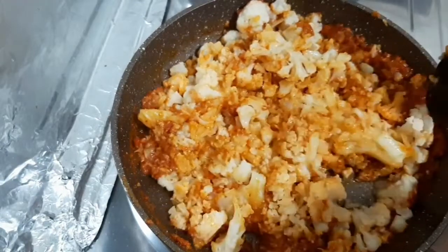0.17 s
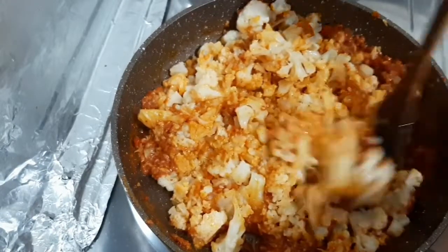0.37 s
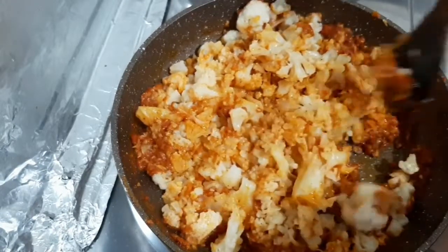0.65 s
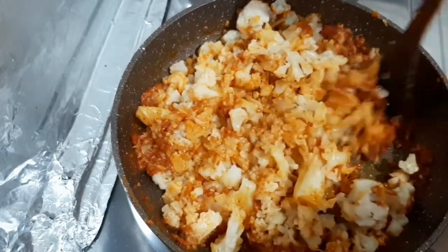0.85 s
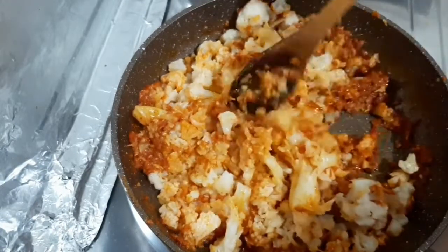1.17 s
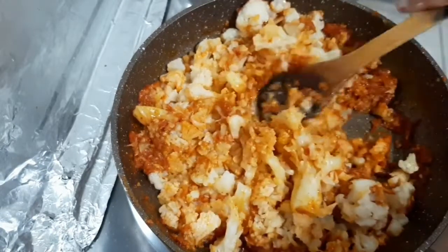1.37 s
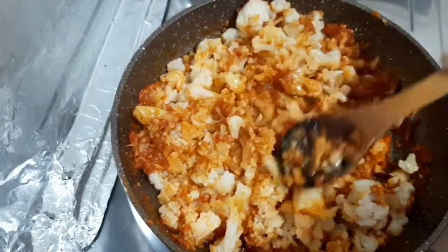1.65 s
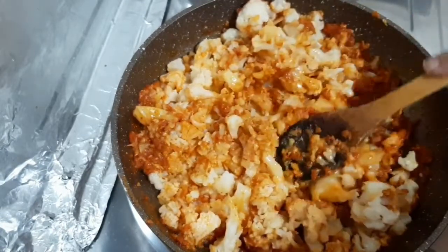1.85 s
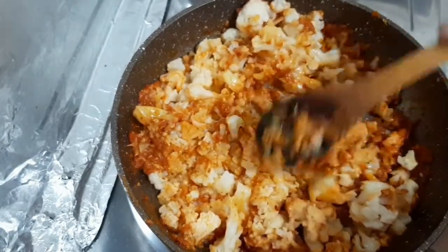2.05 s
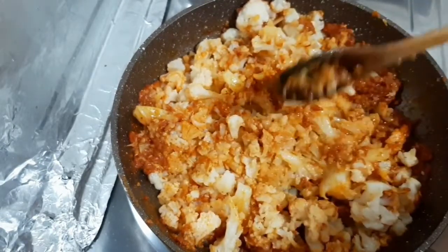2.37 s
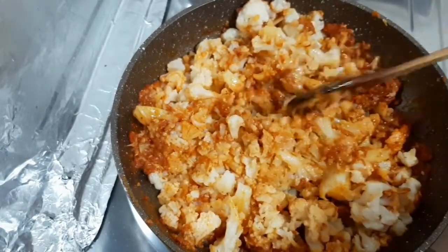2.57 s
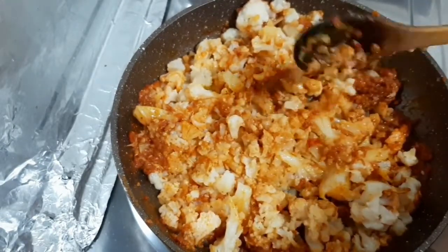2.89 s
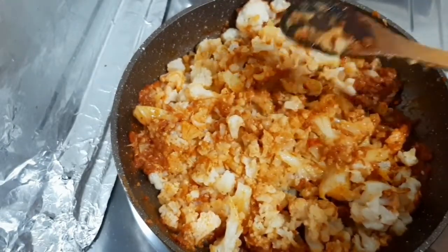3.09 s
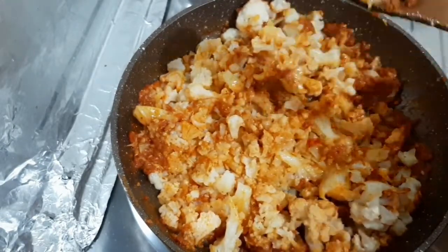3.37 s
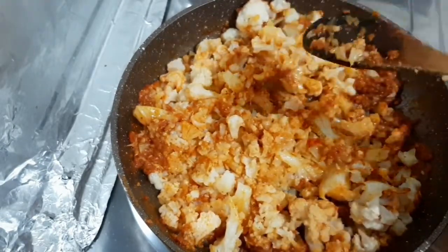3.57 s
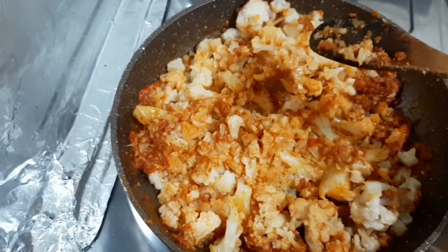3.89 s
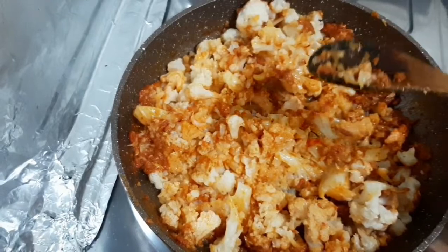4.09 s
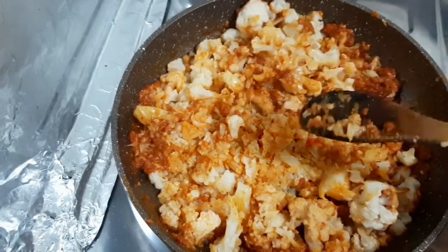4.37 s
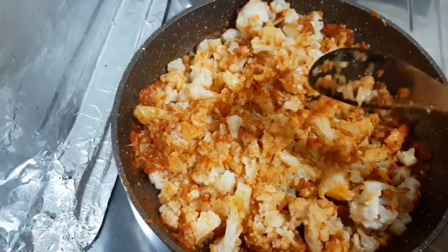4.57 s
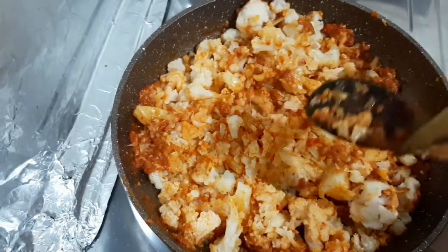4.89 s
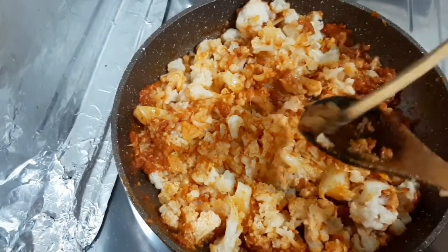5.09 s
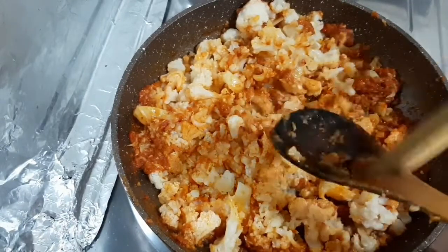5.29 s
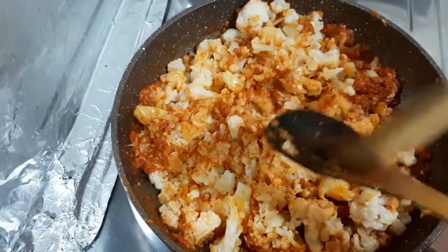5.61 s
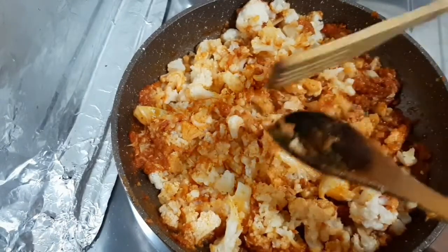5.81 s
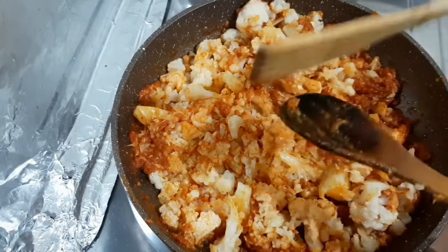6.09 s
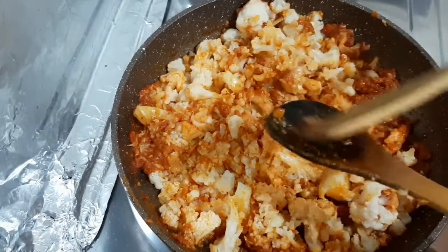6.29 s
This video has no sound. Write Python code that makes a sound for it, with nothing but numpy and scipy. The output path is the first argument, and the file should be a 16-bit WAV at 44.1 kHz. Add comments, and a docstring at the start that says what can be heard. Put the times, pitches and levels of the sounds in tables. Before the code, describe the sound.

A faint sizzle and a low, throbbing appliance hum run throughout in a small kitchen, the sizzle easing toward the end. From the start to about 2.3 seconds, a wooden spatula stirs cauliflower in sauce with soft wet squelches and tiny pops. It scrapes the pan with a brief squeak at 0.3 seconds, then gives a light tap, a small knock and another dark, grainy scrape around 0.8. At 2.7 seconds a loud knock sets the pan ringing, followed by a few quick, fading wobbles and softer scraping. At about 4.1 seconds a bright metallic clink leads straight into a loud, heavy bump that rings briefly. From 4.8 seconds to the end, near 6.4, a second wooden utensil taps the spatula with short, bright clicks, alternating with five soft wipes of wood on wood. The clearest taps fall at 4.8, 5.9 and 6.2 seconds.

```python
"""A wooden spatula stirs cauliflower in sauce in a nonstick pan: tiny slips make it scrape and squelch,
its edge squeaks, and films of sauce snap. Two loud knocks ring out in the small kitchen, the second
a heavy bump led by a metallic clink. Then a second wooden utensil taps the spatula and wipes it clean.
Underneath, steam bubbles sizzle faintly over the low, throbbing hum of an appliance."""
import sys
import numpy as np
from scipy import signal
from scipy.fft import rfft, irfft
from scipy.io import wavfile

SR = 44100
rng = np.random.default_rng(int(sys.argv[2]) if len(sys.argv) > 2 else 0)


def waveform_to_disk(signal):
    """Save audio, clipped to [-1, 1], as 16-bit WAV at the path in sys.argv[1]."""
    frames = np.transpose(np.atleast_2d(signal))
    scaled = np.clip(frames, -1, 1) * 32767
    samples = np.round(scaled).astype(np.int16)
    wavfile.write(sys.argv[1], SR, samples)


N = 284445
T = np.arange(N) / SR
RING = T[:int(.8 * SR)]  # time axis of a ringing tail

# strokes through the wet food: (peak t/s, rise/s, fall/s, level/dB)
WET_STROKES = [(0.361, 0.19, 0.17, -55), (.87, 0.2, 0.31, -56), (1.34, 0.19, 0.23, -61),
               (1.76, .12, 0.069, -55.5), (1.906, 0.053, 0.037, -58.5), (2.199, 0.13, 0.12, -58.5)]


def undb(db):
    """Decibels to gain."""
    return 10 ** (np.asarray(db) / 20)


def unit(x):
    """Scale to an average energy of one per channel."""
    return x / np.sqrt(np.mean(np.sum(x ** 2, axis=-1)))


def curve(rows):
    """Straight-line automation through (t/s, value) points."""
    return np.interp(T, *np.transpose(rows))


def fade(t60):
    """Exponential decay, 60 dB down after t60 seconds."""
    return np.exp(-np.log(1000) * RING / t60)


def convolve(x, response):
    """Pass a sound through a response, keeping its length."""
    return signal.oaconvolve(np.atleast_2d(x), np.atleast_2d(response), axes=-1)[:, :x.shape[-1]]


def colour(x, points, size=8192):
    """Minimum-phase EQ through (f/Hz, level/dB) points that keeps the power of white noise."""
    hz, db = np.transpose(points)
    bin_hz = np.arange(size // 2 + 1) * SR / size
    log_gain = np.interp(np.log(bin_hz + 1), np.log(hz), np.log(undb(db)))
    cepstrum = irfft(log_gain)[:size // 2]
    cepstrum[1:] *= 2
    return convolve(x, unit(irfft(np.exp(rfft(cepstrum, size)))))


def ports(pair, split_hz=850, least_width=0.27):
    """Two microphone ports hear long waves nearly alike and short waves differently."""
    hz = np.arange(pair.shape[-1] // 2 + 1) * SR / pair.shape[-1]
    width = np.clip(hz / np.hypot(hz, split_hz), least_width, 1)
    mid, side = rfft(pair) * np.sqrt([1 - width ** 2 / 2, width ** 2 / 2])
    return irfft(np.array([mid + side, mid - side]), pair.shape[-1])


def noise(size):
    """Diffuse stereo noise."""
    return ports(rng.standard_normal((2, size)))


def walk(per_s):
    """Random drift with a spread near one."""
    knots = rng.standard_normal(512)
    return np.interp(T * per_s, np.arange(len(knots)), knots)


def grains(per_s, spread_db):
    """Random tiny clicks of uneven size, rms one."""
    sizes = rng.standard_normal((2, N)) * undb(spread_db * np.clip(rng.standard_normal(N), -2, 2))
    fires = rng.random(N) < per_s / SR
    return unit(ports(sizes * fires)) * np.sqrt(N)


def add(track, s, sound):
    """Mix a sound in at s seconds."""
    start = int(s * SR)
    track[..., start:start + sound.shape[-1]] += sound[..., :N - start]


def kitchen(x, wet_db, t60_s=0.54, treble_t60_s=0.48, treble_hz=4000, build_s=0.0039):
    """Direct sound plus the dense echo of hard walls, whose treble dies first."""
    field = noise(len(RING))
    low = signal.sosfilt(signal.butter(2, treble_hz, fs=SR, output="sos"), field)
    tail = field * fade(treble_t60_s) + low * (fade(t60_s) - fade(treble_t60_s))
    onset = 1 - np.exp(-(RING / build_s) ** 2)
    return x + undb(wet_db) * convolve(x, unit(tail * onset))


def push(db, contact_ms, size=1024):
    """Force pulse of a blow; a longer contact leaves out the treble."""
    force = np.exp(-RING[:size] * 1000 / contact_ms)
    return undb(db) * np.sqrt(SR / 100) * force / force.sum()


def scatter(spread_ms, count=4, size=4096):
    """Waves run to and fro in the struck object (all-pass echoes), reaching each port by its own path."""
    lags = rng.uniform(.3, 1.7, (count, 1, 1)) * spread_ms / count * SR / 1000
    lags = lags + rng.uniform(0, 5, (count, 2, 1))
    delay = np.exp(-2j * np.pi * np.arange(size // 2 + 1) * np.ceil(lags) / size)
    return irfft(np.prod((.65 + delay) / (1 + .65 * delay), axis=0))


def crack(hits, eq, spread_ms, wet_db):
    """The sharp attack of each blow in the room; an optional pitch ratio stands for where it lands."""
    track = np.zeros((2, N))
    for s, db, contact_ms, *ratio in hits:
        shifted_eq = [(hz * np.prod(ratio), gain_db) for hz, gain_db in eq]
        add(track, s, colour(convolve(scatter(spread_ms), push(db, contact_ms)), shifted_eq))
    return kitchen(track, wet_db)


def ring(hits, modes, build_s, apart_hz=2500):
    """Struck modes swell and ring on; high ones reach the ports out of step."""
    force = np.zeros(N)
    for s, db, contact_ms in hits:
        add(force, s, push(db, contact_ms))
    response = 0
    for hz, db, t60 in modes:
        lag = rng.uniform(0.32, 1) * min(hz / apart_hz, 1) * np.array([[1], [-1]])
        response = response + undb(db) * fade(t60) * np.sin(2 * np.pi * hz * RING + lag)
    return convolve(force, response * (1 - np.exp(-RING / build_s))) / np.sqrt(SR / 100)


def rub(strokes, eq, per_s):
    """Tiny slips follow the pressure of each stroke, which judders in the hand."""
    pressure = sum(undb(db) * np.interp(T, [s - rise, s, s + fall], [0, 1, 0])
                   for s, rise, fall, db in strokes)
    slips = grains(per_s, spread_db=3) * undb(2 * walk(110))
    return colour(slips * pressure, eq)


def tone(hz):
    """A sine of rms one that follows a moving pitch."""
    return np.sqrt(2) * np.sin(2 * np.pi * np.cumsum(hz) / SR)


def appliance(hum_hz=103, upper_hz=147, drone_hz=68.8, throb_hz=2.68, throb_depth=.55, crest_s=.16):
    """Throbbing, wavering motor tones over a low rumble."""
    # slow level ride of the hum: (t/s, level/dB)
    hum_ride = [(0, -61.5), (.5, -61.5), (.8, -51), (1.3, -55.5), (2.5, -55.5), (3.15, -51), (3.55, -63.5),
                (3.75, -55), (4.7, -58.5), (5.2, -54.5), (5.6, -58), (6.05, -52.5), (6.45, -59)]
    # the deep drone swells, holds and sinks back: (middle t/s, length/s, level/dB)
    drone_swells = [(0.755, .26, -55), (5.998, 0.79, -52.5)]
    # EQ of the rumble: (f/Hz, level/dB)
    rumble_eq = [(20, -30), (40, -8.5), (52, -6.5), (85, -0.5), (110, -3.5), (150, 1.5), (175, -8.5),
                 (205, -3.5), (260, -7), (320, -19.5), (410, -17), (550, -31.5), (1000, -37.5), (3000, -56)]
    throb = 1 + throb_depth * np.cos(2 * np.pi * throb_hz * (T - crest_s))
    motor = tone(hum_hz + 1.3 * walk(3.3)) + undb(-13) * tone(200 + 4 * walk(12))
    hum = undb(curve(hum_ride)) * throb * motor
    upper = undb(-62 + 2.4 * walk(3.6)) * tone(upper_hz + 4 * walk(18))
    surge = sum(undb(db) * np.exp(-(2 * (T - s) / length) ** 4) for s, length, db in drone_swells)
    drone_pitch = drone_hz + .8 * walk(3)
    drone = (undb(-75) + surge) * (tone(drone_pitch) + undb(-7) * tone(2 * drone_pitch))
    return hum + upper + drone + undb(-58) * colour(noise(N), rumble_eq)


def sizzle(crackle_db=-7):
    """Countless small steam bubbles burst in the sauce; a few stand out as crackle."""
    # the frying eases off: (t/s, level/dB)
    frying_ride = [(0, -64), (4.7, -65.5), (5.2, -67.5), (6.45, -69)]
    # bright EQ of the bubbles: (f/Hz, level/dB)
    bubble_eq = [(400, -13.5), (1000, -12), (1550, -3.5), (2500, -5.5), (3900, 3), (6000, -1.5),
                 (7600, -1.5), (9500, -5), (12500, 2), (16000, -5)]
    crackle = undb(crackle_db) * grains(per_s=350, spread_db=5)
    bubbles = noise(N) + crackle
    level = undb(curve(frying_ride) + 1 + .4 * walk(8.4))
    return colour(bubbles * level, bubble_eq)


def squelches(hollow_db=-70):
    """The spatula slips through wet food, with the barest ring from the hollow it digs."""
    # EQ of the wet food: (f/Hz, level/dB)
    food_eq = [(600, -20), (1150, -20), (1550, -1.5), (1780, -20), (2050, 4.5), (2300, -6.5), (2600, -1),
               (3400, -3.5), (5500, -4.5), (9000, -5.5), (16000, -7.5)]
    # resonance of the hollow: (f/Hz, level/dB)
    hollow_eq = [(1000, -30), (1520, 3), (2000, -9.5), (3500, -33)]
    food = rub(WET_STROKES, food_eq, per_s=1200)
    return food + undb(hollow_db) * rub(WET_STROKES, hollow_eq, per_s=910)


def faint_films(per_stroke=2, relative_db=-5, spread_db=2.5, hz=5600, spread_octaves=.4):
    """Each wet stroke bursts a few faint films of sauce at chance moments: (t/s, level/dB, f/Hz)."""
    return [(rng.uniform(s - rise, s + fall),
             db + relative_db + spread_db * rng.uniform(-1, 1),
             hz * 2 ** (spread_octaves * rng.uniform(-1, 1)))
            for s, rise, fall, db in WET_STROKES for _ in range(per_stroke)]


def sauce_pops(decay_cycles=7):
    """Each snapping film of sauce swells and rings for a few cycles against the pan's wall."""
    # the films that stand out: (t/s, level/dB, f/Hz)
    loud_films = [(1.058, -59, 6940), (1.365, -60, 2500), (1.894, -57, 2620), (1.917, -59, 2500),
                  (2.134, -57.5, 5800), (2.173, -56, 4063), (2.265, -56.5, 2887)]
    track = np.zeros((2, N))
    for s, db, hz in loud_films + faint_films():
        snap = unit(np.sin(2 * np.pi * hz * RING) * RING * fade(decay_cycles / hz))
        add(track, s, undb(db) * np.sqrt(SR / 100) * convolve(scatter(spread_ms=1.5), snap))
    return track


def pan_scrapes():
    """The spatula drags along the pan with a dark, grainy scrape."""
    # strokes on the pan: (peak t/s, rise/s, fall/s, level/dB)
    strokes = [(.262, 0.062, 0.041, -47), (.345, 0.067, 0.041, -48.5), (.846, 0.06, 0.067, -43),
               (3.15, 0.29, 0.13, -54.5), (3.36, 0.069, 0.065, -60.5), (3.74, .06, .25, -69),
               (4.04, 0.1, 0.035, -46.5)]
    # EQ of the scraped pan: (f/Hz, level/dB)
    pan_eq = [(40, -48.5), (100, -6.5), (290, 0), (420, -3), (550, -6), (740, -3.5), (1100, -11.5),
              (2100, -14), (3500, -21), (7000, -23), (16000, -42)]
    return rub(strokes, pan_eq, per_s=2500)


def squeak(start_s=.331, length_s=0.037, hz=2060, db=-45, rasp_db=-2):
    """The spatula's edge sticks and slips quickly and unevenly on the coating."""
    gate = np.clip(1 - (2 * (T - start_s) / length_s - 1) ** 2, 0, 1) ** .5
    waver = .07 * np.roll(walk(700), int(start_s * SR))
    band = signal.butter(2, [1900, 3200], "band", fs=SR, output="sos")
    rasp = unit(signal.sosfilt(band, rng.standard_normal((2, N)))) * np.sqrt(N)
    return undb(db) * gate * (tone(hz * (1 + waver)) + undb(rasp_db) * rasp)


def wood_taps():
    """Wood taps lightly on wood: short, bright clicks."""
    # taps: (t/s, level/dB, contact/ms, pitch ratio)
    hits = [(.6924, -47.5, 0.02, 1.66), (4.8090, -32, 0.016, 1.04), (4.8183, -45, .05, 0.95),
            (5.284, -47, 0.21, .95), (5.626, -45, 0.038, 0.885), (5.9450, -33.5, 0.081, 0.87),
            (6.021, -45, .1, .86), (6.2323, -27.5, 0.11, 0.99)]
    # EQ of a tap: (f/Hz, level/dB)
    tap_eq = [(200, -21), (450, -19.5), (820, -3.5), (1100, -7.5), (1450, -6), (2200, -9.5), (3250, 5.5),
              (4200, 2), (5200, -1), (6400, -0.5), (8000, -13), (16000, -16)]
    return crack(hits, tap_eq, spread_ms=0.63, wet_db=-3.5)


def pan_knocks(rock_s=2.9025, gap_s=.081, rock_db=-33.5, loss_db=7, rock_contact_ms=0.22):
    """Wood knocks the pan into ringing; after the loud knock it rocks in even, weakening rebounds."""
    # knocks: (t/s, level/dB, contact/ms)
    hits = [(.8100, -32.5, 0.35), (2.6885, -14.5, 0.057)]
    # EQ of the attack: (f/Hz, level/dB)
    attack_eq = [(35, -35), (100, -18), (300, -1), (500, -13.5), (1000, -15.5), (1750, -3.5), (2250, -10.5),
                 (2500, -2), (3000, -21), (4100, -14), (5200, -21), (6500, -17), (8500, -28.5),
                 (16000, -25.5)]
    # modes of the pan: (f/Hz, level/dB, t60/s)
    modes = [(166.8, -25.5, 0.59), (199, -17, 0.3), (280.7, -8, 0.38), (296.5, -13.5, 0.4),
             (338, -11, 0.24), (403, -10, 0.35), (919, -12.5, 0.17), (1724, -19, .4), (1780, -19.5, 0.4),
             (2490, -12, 0.16), (2400, -13, 0.2)]
    rebounds = [(rock_s + k * gap_s, rock_db - k * loss_db, rock_contact_ms) for k in range(4)]
    attack = crack(hits + rebounds, attack_eq, spread_ms=2.6, wet_db=-1.0)
    return attack + undb(1.5) * ring(hits, modes, build_s=0.011)


def heavy_bumps():
    """Dull, heavy blows set low modes ringing."""
    # bumps: (t/s, level/dB, contact/ms)
    hits = [(3.887, -45.5, 0.94), (3.9695, -38, 0.43), (4.0902, -20, 0.018), (4.0935, -12, 0.079)]
    # EQ of the attack: (f/Hz, level/dB)
    attack_eq = [(35, -52), (100, -13), (220, -1.5), (400, -3), (700, -0.5), (1000, -9), (1600, -7),
                 (2800, -16), (4500, -16), (7000, -23), (9000, -26.5), (16000, -43)]
    # modes that give the bump its body: (f/Hz, level/dB, t60/s)
    modes = [(131, -26, 0.42), (156.9, -20, 0.71), (202, -14.5, 0.48), (267.7, -13, 0.42),
             (342.8, -3.5, 0.29), (439, -4.5, 0.35), (478, -13.5, 0.33), (535, -21, .38), (614, -33.5, .35),
             (637, -11, 0.14), (648, -9.5, 0.29), (866, -16.5, 0.24), (1157, -16, 0.44)]
    return crack(hits, attack_eq, spread_ms=4.5, wet_db=-2.5) + ring(hits, modes, build_s=0.014)


def metal_clink():
    """Struck metal chatters and rings high."""
    # chattering contacts: (t/s, level/dB, contact/ms)
    hits = [(4.0655, -17.5, 0.039), (4.0765, -25, 0.017), (4.092, -34.5, 0.14)]
    # EQ of the attack: (f/Hz, level/dB)
    attack_eq = [(35, -43.5), (150, -5.5), (400, -10), (900, -6), (1500, -9.5), (2800, 1.5), (3600, -10.5),
                 (4700, -15), (5600, -0.5), (6500, -21), (9000, -17), (16000, -17.5)]
    # modes of the metal: (f/Hz, level/dB, t60/s)
    modes = [(2510, -11, .25), (2979, -8, .5), (3017, -9, .48), (4102, -15, .4), (5216, -18, .42),
             (5459, -16, .4), (5648, -15, .33)]
    attack = crack(hits, attack_eq, spread_ms=5, wet_db=1.5)
    return undb(-3.5) * attack + ring(hits, modes, build_s=.001)


def wood_wipes(rise_s=0.082, fall_s=0.062):
    """Wood wipes along wood after the closing taps, always with the same swing."""
    # wipes: (peak t/s, level/dB)
    wipes = [(4.984, -52.5), (5.409, -51.5), (5.695, -49.5), (6.009, -47.5), (6.296, -50.5)]
    # EQ of rubbed wood: (f/Hz, level/dB)
    wood_eq = [(250, -26), (500, -12), (780, -2.5), (1050, -9.5), (1450, -0.5), (1850, -11), (2400, -8.5),
               (3300, -3.5), (5000, -6), (7000, -7.5), (9500, -12.5), (16000, -14)]
    return rub([(s, rise_s, fall_s, db) for s, db in wipes], wood_eq, per_s=4000)


def scene():
    """Impacts, stirring and sizzle sit a hair to the left, over the appliance."""
    impacts = pan_knocks() + heavy_bumps() + metal_clink() + wood_taps()
    stirring = kitchen(pan_scrapes() + wood_wipes() + squelches() + squeak() + sauce_pops(), wet_db=-8)
    balance = undb(0.24 * np.array([[1], [-1]]))
    return (impacts + stirring + sizzle()) * balance + appliance()


def record(dry):
    """A steep low-pass cuts the top at 16 kHz."""
    return signal.sosfilt(signal.ellip(10, .2, 80, 16000, fs=SR, output="sos"), dry)


dry = scene()
out = record(dry)
waveform_to_disk(out)
```